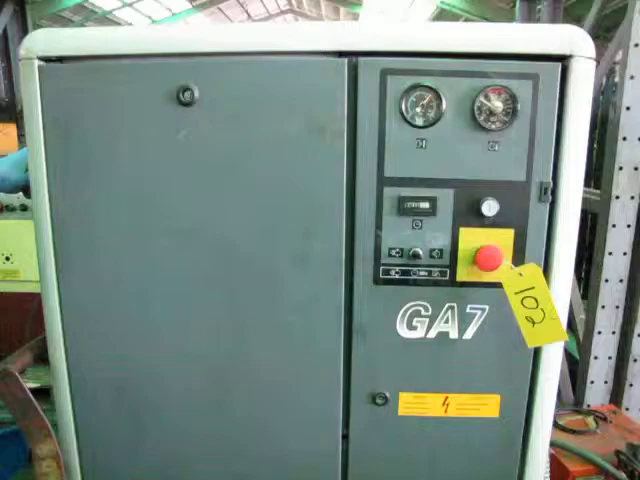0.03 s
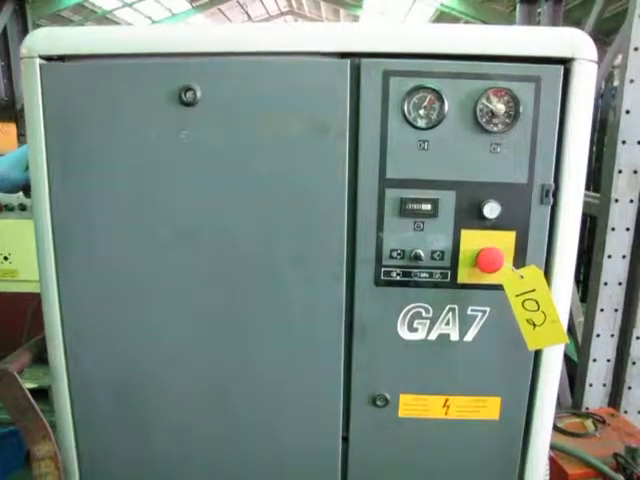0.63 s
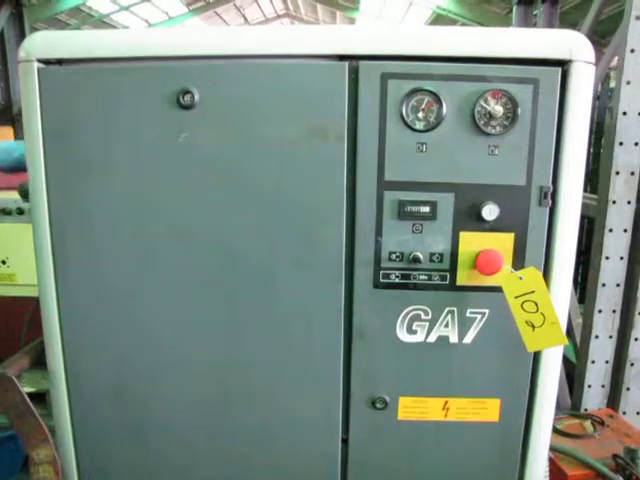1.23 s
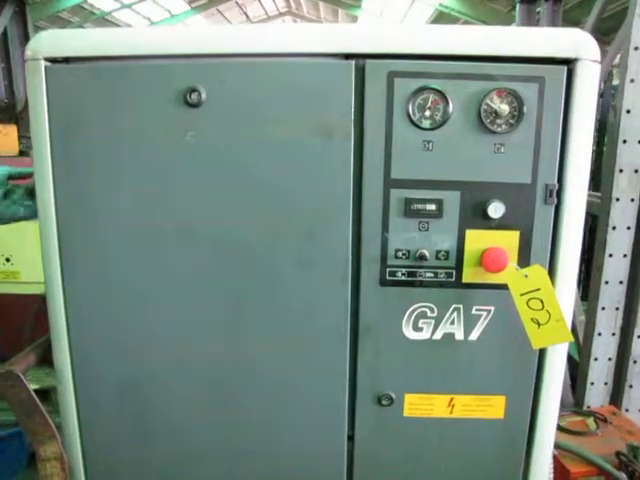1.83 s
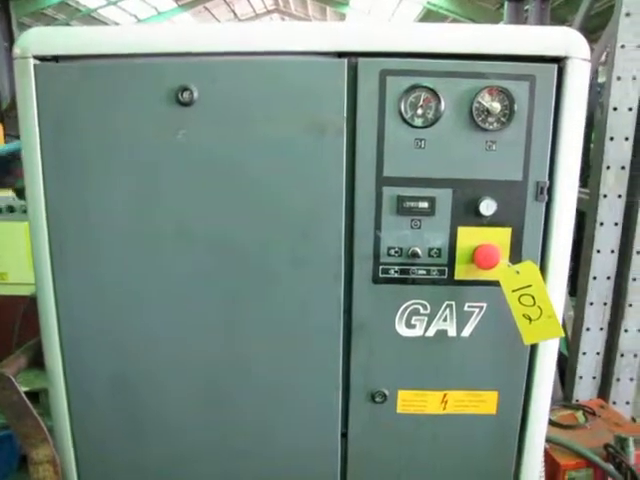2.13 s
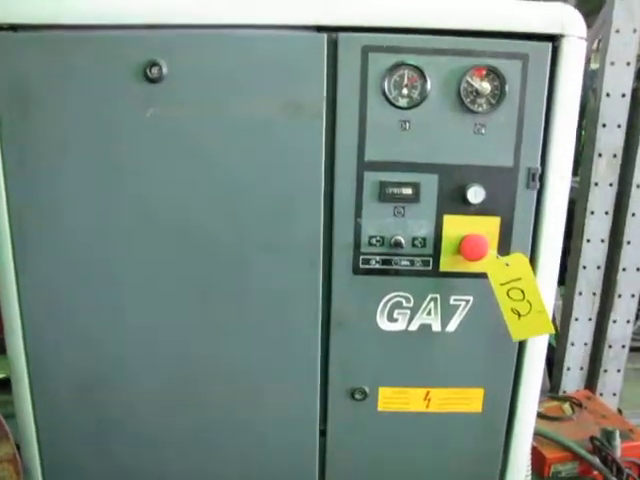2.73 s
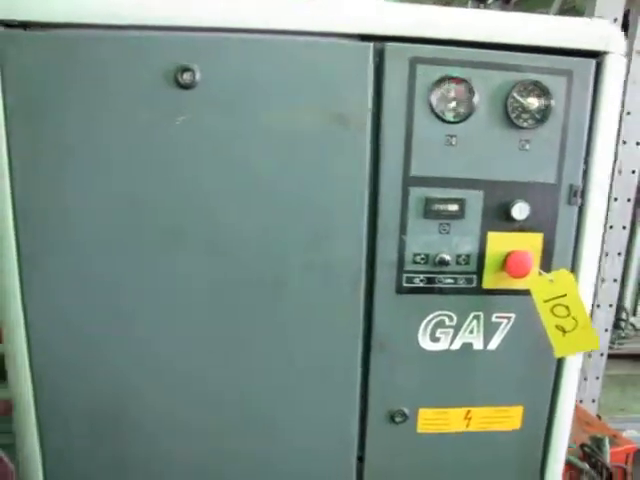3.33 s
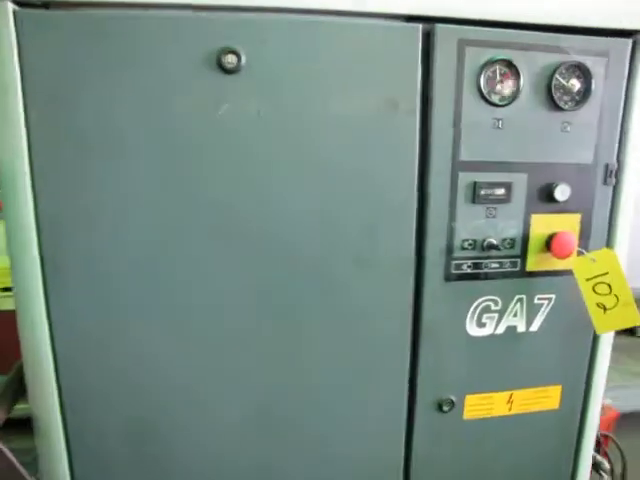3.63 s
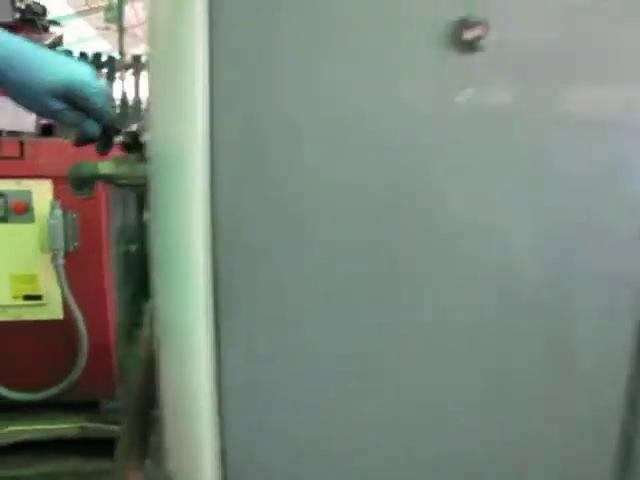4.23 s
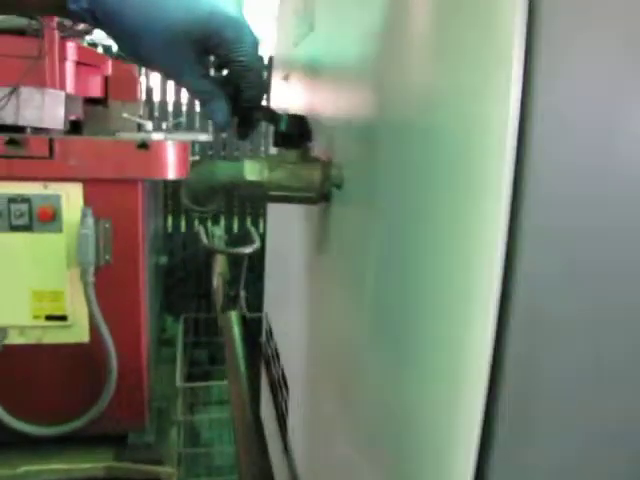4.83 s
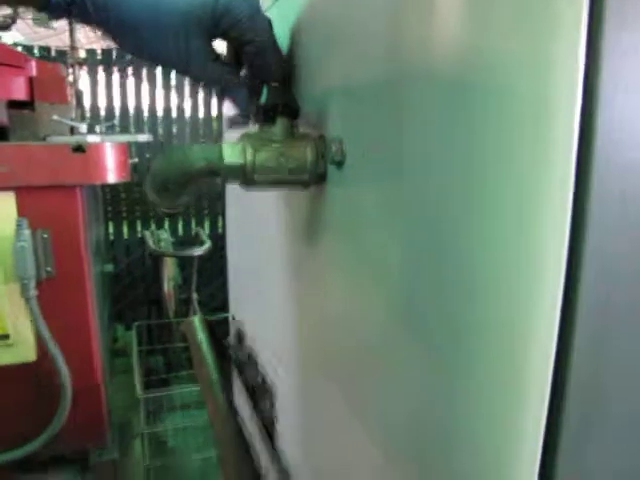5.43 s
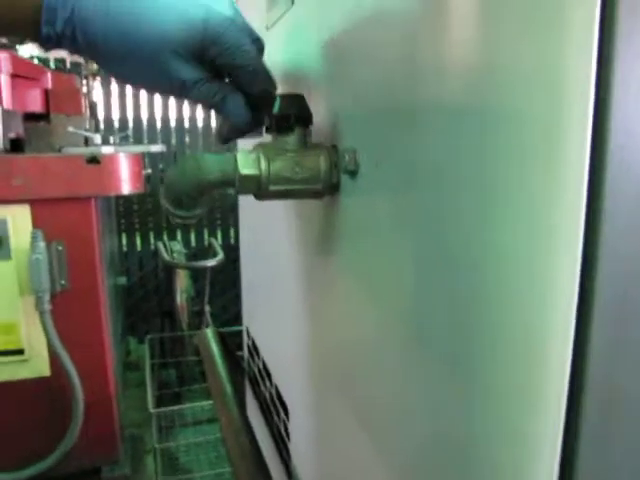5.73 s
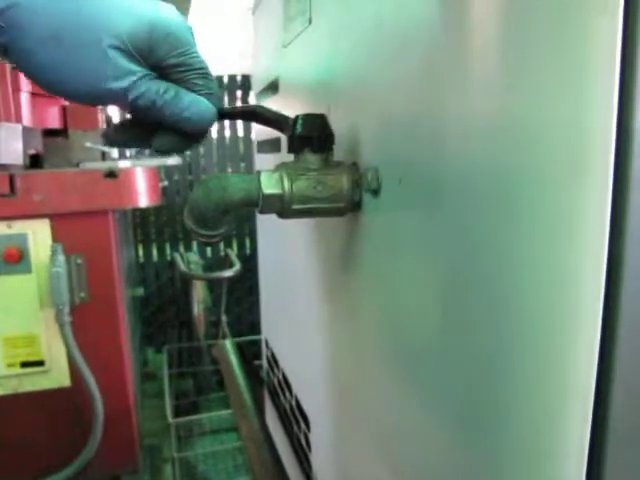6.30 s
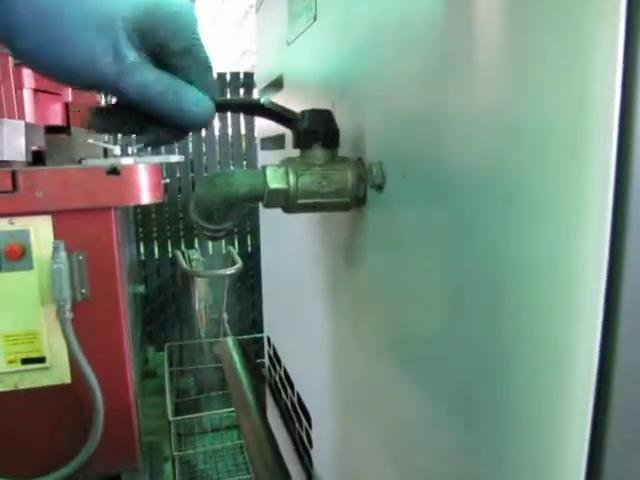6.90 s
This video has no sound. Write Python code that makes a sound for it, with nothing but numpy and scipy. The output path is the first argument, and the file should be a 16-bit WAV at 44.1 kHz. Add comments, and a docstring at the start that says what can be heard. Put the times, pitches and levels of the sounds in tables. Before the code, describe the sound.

In a warehouse, compressed air escapes from a compressor's valve with a crack and a loud hiss, briefly roaring as a hand crosses the stream. Heard first from around the cabinet's corner and then right beside the valve, the hiss stops abruptly and the machine's drone comes forward. The air returns with faint high whistles and some wind on the microphone, then narrows as the valve is nearly closed.

```python
"""A sharp crack, then compressed air hissing from a ball valve and elbow on a screw compressor,
which hums and rumbles in a warehouse. From in front of the cabinet the jet is round the corner;
a gloved hand passes through it, roaring and swooping. The microphone moves round to the valve,
which is shut, opened wide and eased back. Half closed, the valve lets the elbow ring;
wide open, its draught buffets the microphone."""
import sys
import numpy as np
from scipy import signal
from scipy.fft import rfft, irfft, next_fast_len
from scipy.io import wavfile
from scipy.ndimage import map_coordinates

SR = 44100
rng = np.random.default_rng(int(sys.argv[2]) if len(sys.argv) > 2 else 0)


def digitize_waveform(pressure):
    """Quantize a signal to 16-bit integers and store it at the path in sys.argv[1].

    Rows of a 2-D input are taken as channels; values are limited to [-1, 1].
    """
    field = np.atleast_2d(pressure).T
    bounded = np.clip(field, -1, 1)
    quanta = np.round(bounded * 32767).astype(np.int16)
    wavfile.write(sys.argv[1], SR, quanta)


N = 315756
TIME = np.arange(N) / SR
FRAME, START_S = 512, .0725
LEFT_RIGHT = np.array([[1], [-1]])  # adds at the microphone's left port, subtracts at its right


# the cabinet's shadow on the microphone: f/Hz, left minus right/dB
CABINET_SHADE = [(700, 3.5), (1300, -1), (2400, -5), (4400, 3), (8000, -1), (15000, 2)]

def jet(direct_db=-2.5, echo_db=-4, scatter_db=-4, focus_db=1.5, far_db=1.38, far_pan_db=2.5):
    """The hiss reaches the microphone straight from the left, off nearby surfaces and scattered."""
    source, *scattered = turbulence()
    near = nearness()
    _, flow, throttle = valve()
    direct = np.array([source, right_port(source)])
    echoes = np.array([reflections(source, near) for port in range(2)])
    # a throttled jet sounds from one point, an open one from its whole plume
    plume = from_db(scatter_db - focus_db * throttle) * np.array(scattered)
    air = from_db(direct_db + throttle) * direct + from_db(echo_db) * echoes + plume
    # long waves from afar reach both ports alike
    long_waves = coloured((air[0] - air[1]) / 2, [(1100, -3), (2200, -30), (4400, -60)])
    air -= (1 - near) * long_waves * LEFT_RIGHT
    for port, sign in enumerate((1, -1)):
        air[port] = coloured(air[port], [(hz, sign * db / 2) for hz, db in CABINET_SHADE])
    sputter_db = .5 * (1 + hand_in_jet()) * drift(25)
    pan_db = far_pan_db * (1 - near ** 2)
    return air * flow * from_db(far_db * (1 - near) + sputter_db + pan_db / 2 * LEFT_RIGHT)


# the hiss from round the cabinet's corner, and close beside the valve: f/Hz, level/dB
FAR_HISS = [(410, -18), (700, -15), (828, -17), (919, -10), (1120, -8.5), (1480, -6.5), (1760, -5),
            (1900, -5), (2990, -5.5), (5220, -5), (6260, -6.5), (8430, -1), (9720, -5.5), (14300, -4),
            (15500, -10.5)]
CLOSE_HISS = [(150, -36), (250, -11), (413, -10.5), (450, -15), (742, -9), (1080, -7), (2850, -3.5),
              (3160, -4.5), (4550, -1), (5040, 0.5), (7130, -0.5), (7770, -0.5), (9890, -7), (12400, -11),
              (15500, -16)]

def turbulence(wander_db=1.15):
    """Three unrelated streams of jet noise, coloured by distance, elbow and lip."""
    hz, t, noise = signal.stft(rng.standard_normal((3, N)), SR, nperseg=FRAME)
    hz = hz[:, None]
    near = nearness(t)
    colour_db = (1 - near) * at_hz(FAR_HISS, hz) + near * at_hz(CLOSE_HISS, hz)
    colour_db += elbow(hz, t) + lip_whistles(hz, t) + wander_db * wander(hz, t)
    colour_db += eddy_balance(colour_db, hz, t)
    return signal.istft(noise * from_db(colour_db), SR, nperseg=FRAME)[1][:, :N]


# the jet close up, harshest half open: opening/0-1, roar/dB, hiss/dB, sizzle/dB
EDDY_LEVELS = [(.2, -20.5, -17.5, -24.5), (.4, -22.5, -13, -19), (.7, -24, -15.5, -20),
               (1, -22.5, -17, -14.5)]

def eddy_balance(colour_db, hz, t, corner_db=(-7, -3.5, -7), throttled_db=(-2, -6, -4)):
    """Gain in dB that gives large, middle and small eddies (roar, hiss, sizzle) their own strength."""
    opening, _, throttle = valve(t)
    # the cabinet's corner screens the jet, a throttled one more
    screen_db = (1 - nearness(t)) * (np.array(corner_db)[:, None] + np.outer(throttled_db, throttle))
    hand_db = np.outer((2, .8, 2), hand_in_jet(t))  # the hand splits the jet into more eddies
    target_db = np.array(in_time(EDDY_LEVELS, opening)) + screen_db + hand_db
    power = from_db(colour_db) ** 2 / (FRAME / 2)
    bands_hz = [(900, 3500), (3800, 10000), (10000, 15500)]
    band_power = [(power * ((hz > low) & (hz < high))).sum(0) for low, high in bands_hz]
    roar_db, hiss_db, sizzle_db = target_db - 10 * np.log10(band_power)
    large = 1 / (1 + (hz / 3600) ** 8)
    small = 1 / (1 + (10000 / (hz + 1)) ** 10)
    return large * roar_db + (1 - large - small) * hiss_db + small * sizzle_db


# the lever on the cabinet's side: t/s, opening/0-1
VALVE_LEVER = [(0, 0.38), (.48, 0.46), (.57, 0.64), (.85, 0.77), (4.82, 0.67), (4.89, 0.4), (4.958, 0.27),
               (4.968, 0), (5.843, 0.02), (5.858, .22), (5.94, 0.46), (6.05, 0.79), (6.35, 0.88),
               (6.6, 0.8), (6.93, 0.78), (6.975, 0.47), (7.11, 0.2), (7.16, 0.13)]

def valve(t=TIME, pinch_opening=.22, free_opening=.7):
    """The lever sets the opening, the flow and the throttle (how strongly the elbow rings), each 0-1."""
    opening = np.clip(in_time(VALVE_LEVER, t)[0], 0, 1)
    puff = from_db(-9) * bell(4.998, .01, t)  # the ball leaks once as it seats
    flow = np.minimum(opening / pinch_opening, 1) ** 2 + puff
    throttle = np.interp(opening, [pinch_opening, free_opening], [1, 0])
    return opening, flow, throttle


# the elbow's quarter-wave modes, and the hollows between them: f/Hz, width/Hz, level/dB
ELBOW_MODES = [(1087, 83, 13.5), (2580, 210, 9), (4590, 1030, 11.5), (6120, 850, 11.5), (8400, 1200, 4),
               (9600, 450, 6.5)]
ELBOW_HOLLOWS = [(3200, 1300, -1.5), (10360, 900, 0)]

def elbow(hz, t, scoop=3.3):
    """The elbow's colour in dB: throttling raises its modes and deepens the dip between them."""
    _, _, throttle = valve(t)
    modes_db = sum(db * resonance(hz, f, width) for f, width, db in ELBOW_MODES)
    hollows_db = sum(db * resonance(hz, f, width) for f, width, db in ELBOW_HOLLOWS)
    return throttle * modes_db + (1 + scoop * throttle) * hollows_db


# whistles at the outlet's lip, close up: start t/s, end t/s, from f/Hz, to f/Hz, level over hiss/dB
LIP_WHISTLES = [(3.8, 4.97, 8000, 7500, 4.5), (5.8, 6.04, 8250, 8750, 7), (6.218, 6.66, 7850, 8900, 6.5),
                (6.68, 7.2, 5850, 5600, 4.5), (6.93, 7.07, 8400, 8440, 7)]

def lip_whistles(hz, t, width_hz=720, fade_s=.099):
    """Each whistle is a broad, gliding peak on the hiss, in dB."""
    peaks_db = 0
    for start, end, from_hz, to_hz, db in LIP_WHISTLES:
        centre_hz = np.interp(t, [start, end], [from_hz, to_hz])
        peaks_db += db * held_between(start, end, fade_s, t) * resonance(hz, centre_hz, width_hz)
    return peaks_db


# the microphone's walk round the cabinet: t/s, nearness/0-1
MICROPHONE_WALK = [(0, 0.01), (3.35, .03), (4.2, 0.66), (4.7, 0.94), (5.9, 1)]

def nearness(t=TIME):
    """0 in front of the cabinet, 1 beside the valve."""
    return np.clip(in_time(MICROPHONE_WALK, t)[0], 0, 1)


# the right port's lag with the jet round the corner: f/Hz, phase/rad
PORT_LAG = [(100, 11), (1900, -2.26), (2700, 1.5), (3400, 3), (4300, 0.48), (6000, 2), (7600, 1.32),
            (9400, 4), (13000, 4), (15500, 1.5)]

def right_port(x):
    """Sound from the left bends round the housing and arrives late, until the microphone faces it."""
    hz, t, spectrum = signal.stft(x, SR, nperseg=FRAME)
    lag = at_hz(PORT_LAG, hz)[:, None] * (1 - nearness(t) ** 2)
    return signal.istft(spectrum * np.exp(-1j * lag), SR, nperseg=FRAME)[1][:N]


def hand_in_jet(t=TIME):
    """1 while the hand is in the stream."""
    return held_between(start_s=1.38, end_s=2.11, fade_s=.059, t=t)


# parts of the glove crossing the jet's core, round the corner: t/s, half-length/s, level/dB
GLOVE_CROSSINGS = [(1.436, 0.054, -29), (1.811, 0.035, -18), (1.88, 0.28, -24.5), (1.945, 0.016, -23),
                   (1.99, 0.011, -21)]
# air breaking on the glove: f/Hz, level/dB
GLOVE_ROAR = [(150, -34), (350, -16), (700, -14.5), (900, -11.5), (1150, -1), (1500, -4), (2000, -2.5),
              (2400, -14), (3200, -17), (6000, -40)]
# hollow swoops between the fingers: t/s, length/s, from f/Hz, to f/Hz, level/dB
FINGER_SWOOPS = [(1.747, 0.045, 1155, 1285, -19), (1.806, 0.055, 1330, 1020, -31),
                 (1.91, 0.072, 1450, 1133, -25), (1.975, 0.032, 1298, 960, -23),
                 (2.033, 0.056, 1665, 1944, -24), (2.102, 0.29, 994, 870, -40), (2.53, 0.2, 880, 707, -39)]

def glove(swoop_width_hz=90):
    """Air roars as it breaks on the hand; the gaps between the fingers swoop in pitch."""
    power = sum((from_db(db) * bell(s, half_s)) ** 2 for s, half_s, db in GLOVE_CROSSINGS)
    out = np.sqrt(power) * stereo_noise(GLOVE_ROAR, side_db=-8.5)
    for s, length, from_hz, to_hz, db in FINGER_SWOOPS:
        along = np.clip((TIME - s) / length, 0, 1)
        phase = phase_of(from_hz + (to_hz - from_hz) * along)
        narrow_noise = drift(swoop_width_hz) * np.cos(phase) + drift(swoop_width_hz) * np.sin(phase)
        out += from_db(db) * np.sin(np.pi * along) * narrow_noise
    return out


def squeal(at_s=7.124, half_s=.022, hz=12590, level_db=-15, waver_hz=45, port_lag_rad=2.3):
    """A thin, unsteady tone from the nearly shut ball, out of step at the two ports."""
    phase = phase_of(hz + waver_hz * drift(150))
    return from_db(level_db) * bell(at_s, half_s) * np.sqrt(2) * np.sin([phase, phase - port_lag_rad])


# the compressor's hum beside the valve: multiple of the shaft rate, level/dB
SHAFT_HARMONICS = [(1, -55), (2, -52.5), (4, -49.5), (6, -51.5), (9, -48.5), (12, -54.5), (26, -57),
                   (29, -58), (40, -56)]
# the cooling fan in the cabinet: f/Hz, level/dB
FAN_RUMBLE = [(30, -25), (60, -20), (90, -13), (140, -4.5), (200, -0.5), (250, -3), (330, -7.5),
              (600, -7.5), (1000, -18), (2400, -22.5), (4000, -29.5), (7000, -36), (10000, -47),
              (15000, -60)]

def compressor(shaft_hz=59.13, throb=.087, waver_db=1.5, door_db=-2, swell_db=4):
    """Shaft harmonics, the third strongest, over cooling-fan rumble that throbs once a turn."""
    near = nearness()
    turn = phase_of(shaft_hz + .071 * drift(3))
    # the front door drones on the third harmonic and muffles the others
    drone_db = np.interp(near ** 1.5, [0, 1], [-36.5, -47])
    hum = from_db(drone_db + 1.1 * drift(9)) * np.sin(3 * turn)
    for multiple, db in SHAFT_HARMONICS:
        gain = from_db(db + door_db * (1 - near) + waver_db * drift(5))
        hum += gain * np.sin(multiple * turn + rng.uniform(0, 2 * np.pi))
    # the rumble is alike at both ports, its treble diffuse
    mid, side = rms_one(coloured(rng.standard_normal((2, N)), FAN_RUMBLE))
    side = coloured(side, [(100, -33), (500, -16), (3000, -2.5), (7000, -1.5)])
    fan_db = on_the_walk(far_db=-35.5, close_db=-37.5) + swell_db * swell_in_pause()
    fan = from_db(fan_db) * (mid + side * LEFT_RIGHT) * (1 + throb * np.sin(turn))
    return np.sqrt(2) * hum + fan


# the cabinet's air, heard at its vent: f/Hz, level/dB
CABINET_BOOM = [(60, -35), (125, 2), (190, 3), (245, 11), (300, -4), (450, -35), (1500, -60)]

def boom(swell_db=15.5):
    """Air in the cabinet resonates broadly; it comes forward while the hiss is off."""
    level_db = on_the_walk(far_db=-56, close_db=-52.5) + swell_db * swell_in_pause()
    return from_db(level_db) * stereo_noise(CABINET_BOOM, side_db=-44)


def swell_in_pause(swell_s=.17):
    """Rises towards 1 while the hiss is off, bringing rumble and boom forward; falls when it returns."""
    _, flow, _ = valve()
    keep = np.exp(-1 / (swell_s * SR))
    return signal.lfilter([1 - keep], [1, -keep], 1 - flow)


# wind right on the microphone: f/Hz, level/dB
MICROPHONE_WIND = [(15, -7), (35, -12.5), (80, -1.5), (150, -8.5), (350, -11.5), (700, -11), (2000, -40)]

def draught(lumps_db=6, left_db=1.5):
    """Lumpy wind that grows with the opening, different at each port and stronger on the left."""
    opening, _, _ = valve()
    gust = from_db(-33) * bell(6.31, .18)  # the wide-open jet sweeps across the microphone
    strength = from_db(on_the_walk(far_db=-53.5, close_db=-39.5)) * opening + gust
    buffeting = from_db(lumps_db * np.tanh([drift(70), drift(70)]) + left_db * LEFT_RIGHT)
    return stereo_noise(MICROPHONE_WIND, side_db=2) * strength * buffeting


# a soft bump on the microphone's housing: t/s, f/Hz, decay/s, level/dB
HOUSING_BUMP = [(.603, 85, .012, -24)]
# the elbow ringing as the ball seats, close up: t/s, f/Hz, decay/s, level/dB
SEATING_RING = [(4.99, 1016, .02, -29), (4.99, 2480, .012, -31)]

def knocks():
    """The thud on the housing and the ring as the ball seats, made of dying sines."""
    out = np.zeros(N)
    for s, hz, decay_s, db in np.vstack([HOUSING_BUMP, SEATING_RING]):
        age = np.clip(TIME - s, 0, 1)
        out += from_db(db) * np.sin(2 * np.pi * hz * age) * np.exp(-age / decay_s)
    return out


# the bright opening crack: f/Hz, level/dB
CRACK_SPECTRUM = [(100, -15), (1000, -3), (4800, -8.5), (8200, 4), (10000, -14), (15000, -19)]

def crack(level_db=-3, decay_s=.0011):
    """The sound sets in with one sharp crack, a millisecond long."""
    age = np.clip(TIME - START_S, 0, .05)
    return from_db(level_db) * np.exp(-age / decay_s) * stereo_noise(CRACK_SPECTRUM, side_db=-10)


def reflections(x, near, sway_s=.00008, count=7):
    """Floor, panels and shelves return the hiss; their paths slide as the microphone moves."""
    sways = sway_s * np.array([drift(1.5), drift(1.5)])
    out = np.zeros(N)
    for lag_s, slide_s in zip(rng.uniform(.003, .018, count), rng.uniform(-.002, .002, count)):
        delay_s = lag_s + slide_s * near + rng.standard_normal(2) @ sways
        out += map_coordinates(x, [np.arange(N) - delay_s * SR], order=3)
    return out / np.sqrt(count)


# the warehouse all round the microphone: f/Hz, time to fall 60 dB/s
WAREHOUSE_DECAY = [(200, 0.73), (2000, 1.3), (5000, 0.91), (9000, 0.65), (15000, 0.39)]

def warehouse(x, wet_db=-16):
    """A diffuse tail whose highest treble dies first."""
    hz, t, noise = signal.stft(rng.standard_normal((2, SR)), SR, nperseg=FRAME)
    decay = from_db(-60 * t / at_hz(WAREHOUSE_DECAY, hz)[:, None])
    tail = signal.istft(noise * decay, SR, nperseg=FRAME)[1]
    tail = rms_one(tail) / np.sqrt(tail.shape[1])
    return from_db(wet_db) * signal.fftconvolve(x, tail, axes=1)[:, :N]


def on_the_walk(far_db, close_db):
    """A level that passes from its value in front of the cabinet to that beside the valve."""
    return np.interp(nearness(), [0, 1], [far_db, close_db])


def from_db(db):
    """Decibels to gain."""
    return 10 ** (np.asarray(db) / 20)


def rms_one(x):
    """Scale to unit power."""
    return x / np.sqrt(np.mean(x ** 2) + 1e-20)


def phase_of(hz):
    """The running phase of a moving pitch, in radians."""
    return 2 * np.pi * np.cumsum(hz) / SR


def in_time(rows, t):
    """The columns of a curve, read at t along its first column."""
    knots, *columns = np.transpose(rows)
    return [np.interp(t, knots, column) for column in columns]


def at_hz(points, hz):
    """Read a curve on a log-frequency axis."""
    f, value = np.transpose(points)
    return np.interp(np.log(np.maximum(hz, 1)), np.log(f), value)


def coloured(x, spectrum):
    """Give a steady sound a spectrum."""
    size = next_fast_len(N)
    gain = from_db(at_hz(spectrum, np.fft.rfftfreq(size, 1 / SR)))
    return irfft(rfft(x, size) * gain, size)[..., :N]


def stereo_noise(spectrum, side_db):
    """Coloured noise with a common part of rms about 1 and a part opposed at the two ports."""
    mid, side = rms_one(coloured(rng.standard_normal((2, N)), spectrum))
    return mid + from_db(side_db) * side * LEFT_RIGHT


def drift(rate):
    """Smooth chance of spread 1, changing about rate times a second."""
    curve = signal.resample_poly(rng.standard_normal(2000), 8, 1)
    return np.interp(TIME * rate * 8, np.arange(len(curve)), curve)


def wander(hz, t, cell_hz=260, cell_s=.2532):
    """Smooth chance over pitch and time, of spread about 1."""
    field = rng.standard_normal((256, 128))
    return map_coordinates(field, np.broadcast_arrays(hz / cell_hz, t / cell_s), order=3, mode="reflect")


def resonance(hz, centre, width):
    """Shape of a resonance, 1 on top."""
    return 1 / (1 + (2 * (hz - centre) / width) ** 2)


def bell(s, half_s, t=TIME):
    """A smooth swell, 1 at time s."""
    return np.exp(-((t - s) / half_s) ** 2)


def held_between(start_s, end_s, fade_s, t):
    """Fade in, hold at 1, fade out."""
    return np.clip(.5 + np.minimum(t - start_s, end_s - t) / fade_s, 0, 1)


def scene():
    """Air and its reverberation over the running machine; silence until the crack."""
    air = jet() + glove() + squeal()
    machine = compressor() + boom()
    return (air + warehouse(air) + machine + draught() + knocks() + crack()) * (TIME >= START_S)


def record(dry):
    """Full scale limits the peaks and the top is cut at 15750 Hz."""
    low_pass = signal.ellip(12, .1, 80, 15750, fs=SR, output="sos")
    return signal.sosfilt(low_pass, np.clip(dry, -1, 1))


dry = scene()
out = record(dry)
digitize_waveform(out)
```